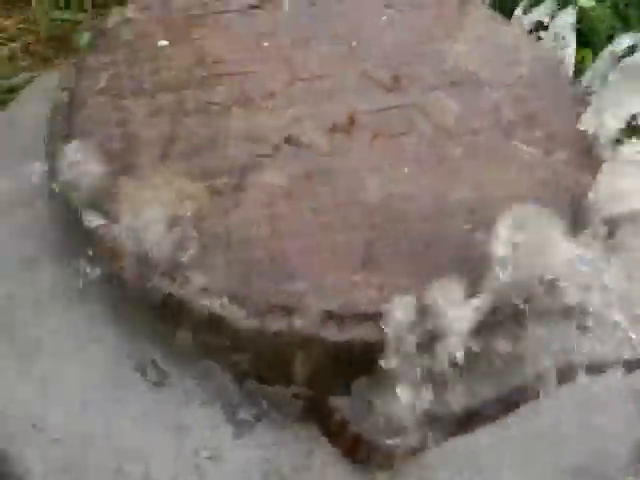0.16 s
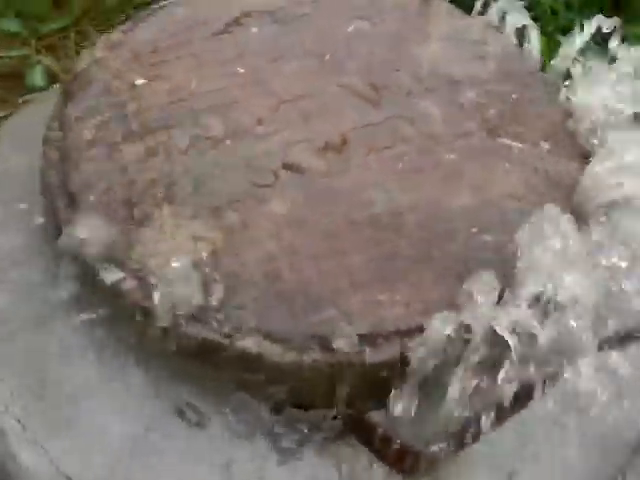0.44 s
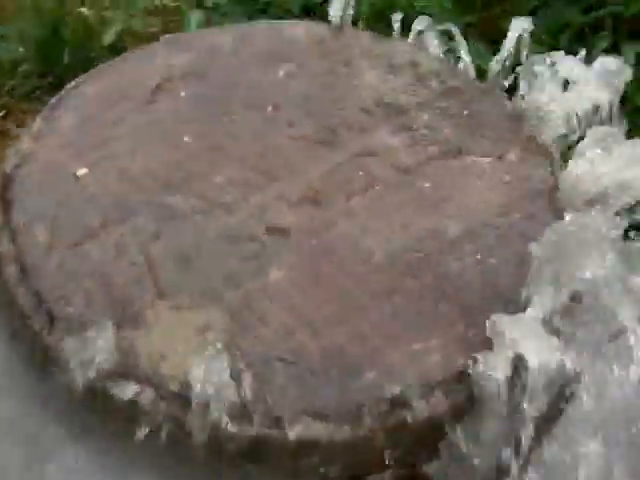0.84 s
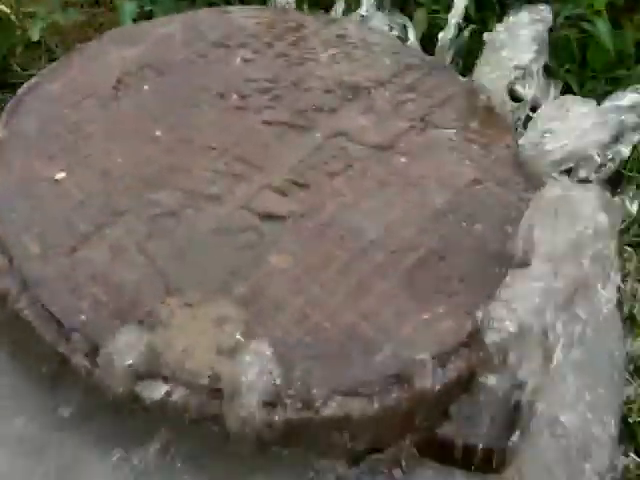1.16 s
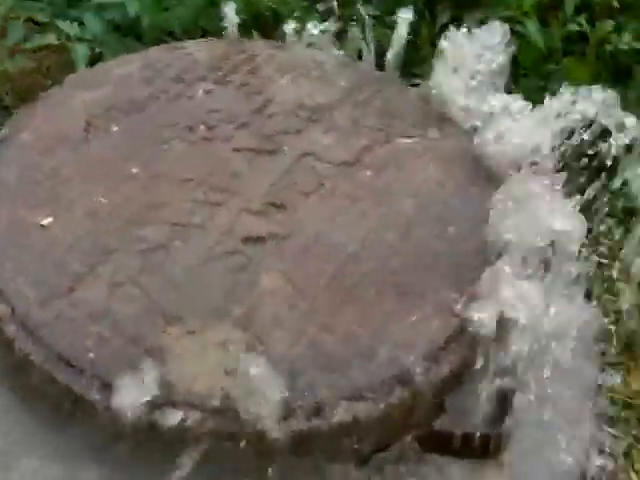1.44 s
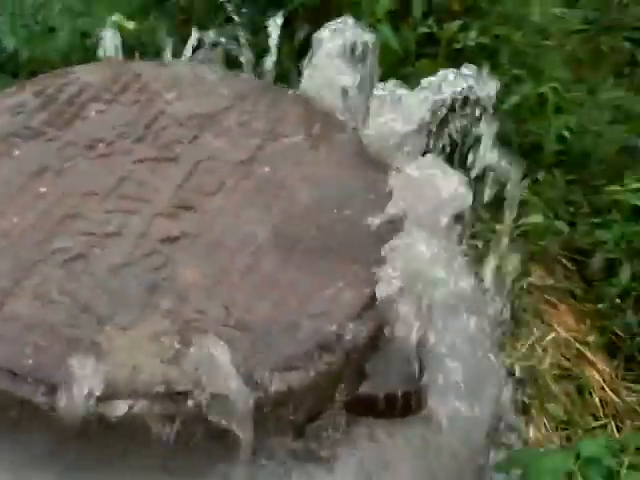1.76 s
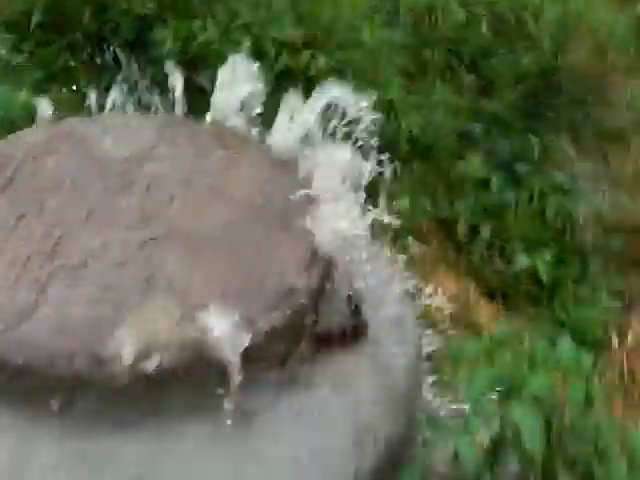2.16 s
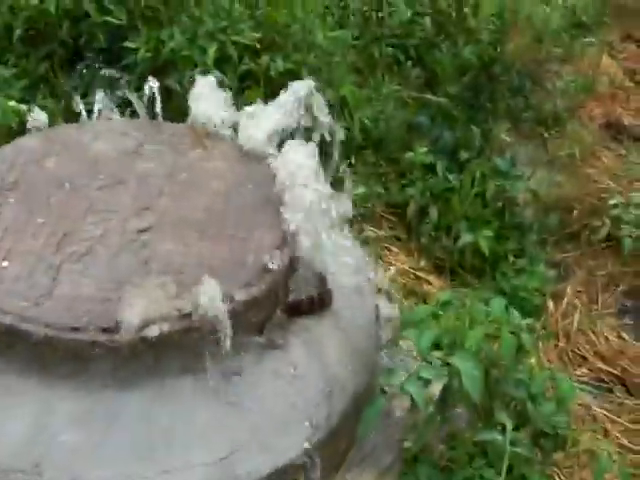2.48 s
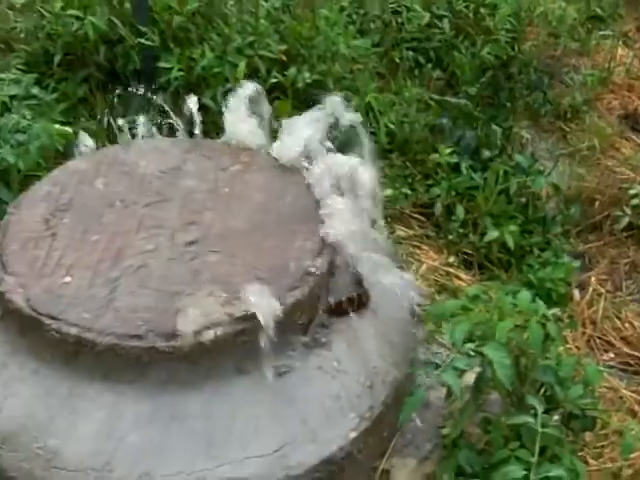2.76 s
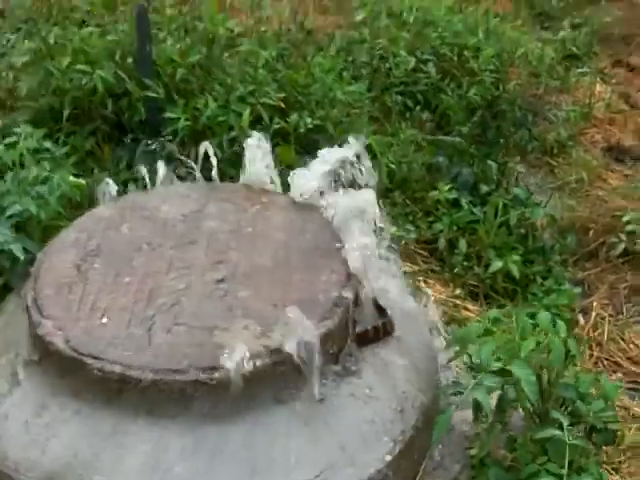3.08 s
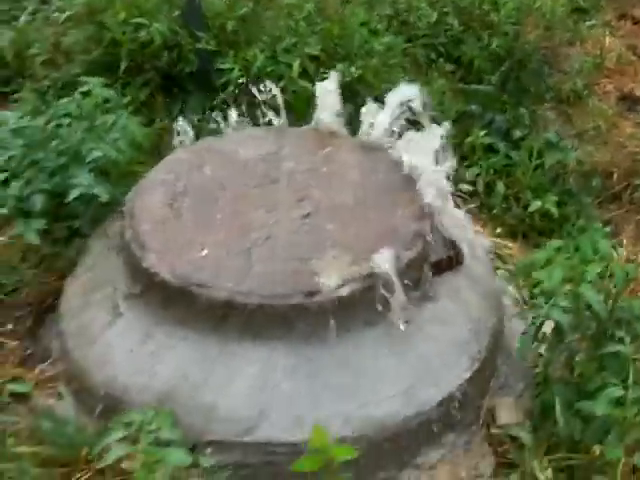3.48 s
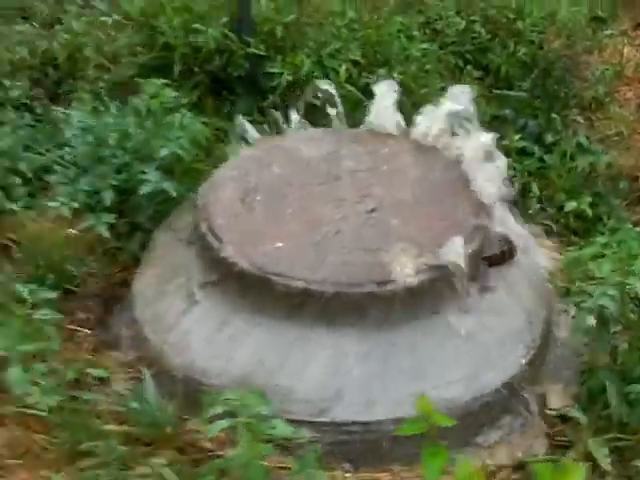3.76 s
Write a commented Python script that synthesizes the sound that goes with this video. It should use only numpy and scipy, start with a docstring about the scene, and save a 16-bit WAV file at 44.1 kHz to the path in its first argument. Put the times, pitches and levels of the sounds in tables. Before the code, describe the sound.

A continuous splashing rush of water spills from under a manhole lid outdoors, with fizzing bubbles and drops hitting concrete. The water softens as the microphone retreats, while wind thumps lightly on it over a faint low hum.

```python
"""A splashing wash of water, gushing out round the rim of a manhole cover onto concrete.
The spray carries countless ringing bubbles and drop ticks; larger plops and splats stand out.
The wash fades as the listener backs away. Underneath, the shaft hums low,
and gusts of wind buffet the microphone."""
import sys
import numpy as np
from scipy import signal
from scipy.fft import rfft, irfft
from scipy.io import wavfile
from scipy.ndimage import uniform_filter1d

SR = 44100
rng = np.random.default_rng(int(sys.argv[2]) if len(sys.argv) > 2 else 0)


def bounce(signal):
    """Save signal as a 16-bit WAV file at the path given by the first command-line argument."""
    frames = np.transpose(np.atleast_2d(signal))
    limited = np.clip(frames, -1, 1)
    pcm = np.round(limited * 32767).astype(np.int16)
    wavfile.write(sys.argv[1], SR, pcm)


N = 172872

# how strongly bubbles ring across the range: (pitch [Hz], level [dB])
BUBBLE_COLOUR = [(900, -8.5), (1500, -5), (2600, 1), (6000, 10.5), (11000, 9.5)]
# bright hiss of drops landing: (frequency [Hz], level [dB])
DROP_COLOUR = [(1200, -17), (3000, 6.5), (5000, 8.5), (11000, 4.5), (16000, -10)]
PLOP_GLIDE = 0.242  # upward chirp of the larger bubbles, as a share of their pitch


def gain_of(db):
    return 10 ** (np.asarray(db) / 20)


def unit_rms(x):
    return x / np.sqrt(np.mean(x ** 2) + 1e-20)


def gain_at(colour, hz):
    """Gain of a (frequency, dB) curve at hz, read along a log frequency axis."""
    corners_hz, db = np.transpose(colour)
    return gain_of(np.interp(np.log(hz + 1), np.log(corners_hz + 1), db))


def fader(points):
    """A (time, dB) curve drawn out to one level a sample."""
    return np.interp(np.arange(N) / SR, *np.transpose(points))


def add(mix, start_s, sound):
    part = mix[round(start_s * SR):][:len(sound)]
    part += sound[:len(part)]


def equalise(x, colour):
    """Shape x with a (frequency, dB) curve and bring it to rms 1."""
    return unit_rms(irfft(rfft(x) * gain_at(colour, np.fft.rfftfreq(N, 1 / SR)), N))


def noise(colour):
    return equalise(rng.standard_normal(N), colour)


def wander(span_s):
    """Smooth random motion of rms 1 that changes over about span_s."""
    width = max(round(span_s * SR), 2)
    return unit_rms(uniform_filter1d(uniform_filter1d(rng.standard_normal(N), width), width))


def scatter(per_s, spread_db):
    """Sparse clicks of random sign, a few of them large."""
    chance, size, sign = rng.random(N), rng.exponential(1, N), rng.choice([-1., 1.], N)
    return sign * gain_of(spread_db * np.minimum(size, 3.2)) * (chance < per_s / SR)


def bubble(hz, cycles, glide, rise=1.0):
    """Trapped air ringing: a sine that swells, chirps upward and dies within some cycles."""
    age = np.arange(round(4 * cycles * SR / hz)) * hz / SR / cycles  # in ring lengths, as is rise
    envelope = 2.31 * (1 - np.exp(-age / rise)) * np.exp(-2 * age)
    return envelope * np.sin(2 * np.pi * cycles * (age + glide * age ** 3 / 3))


def spray(patch_db=3):
    """The main wash: broad noise in which patches of the spectrum swell and sink."""
    frames, bands = N // 64 + 5, 129
    real, imaginary, patches = rng.standard_normal((frames, bands, 3)).T
    patches = uniform_filter1d(patches, 6, axis=0)  # across bands
    patches = unit_rms(uniform_filter1d(patches, 20, axis=1))  # along time
    spectra = (real + 1j * imaginary) * gain_of(patch_db * patches)
    wash = signal.istft(spectra, nperseg=256, noverlap=192)[1][:N]
    # tone of the spray: (frequency [Hz], level [dB])
    spray_colour = [(290, -29), (500, -10), (868, -6), (1060, -15.5), (1870, -0.5), (2690, 1.5), (3860, -1),
                    (6610, -2.5), (11800, -6), (15100, -17), (16000, -23)]
    return gain_of(-5) * equalise(wash, spray_colour)


def fizz(clumps, sizes=56):
    """Thousands of small bubbles a second, each ringing at the pitch of its size, in clumps."""
    births = scatter(per_s=3000 * clumps, spread_db=4)
    size, variation = rng.integers(0, sizes, N), rng.random((sizes, 2))
    out = np.zeros(N)
    for k, hz in enumerate(np.geomspace(897, 11180, sizes)):
        ring, chirp = variation[k]
        grain = bubble(hz, cycles=6.2 * (.5 + ring), glide=0.426 * chirp)
        out += gain_at(BUBBLE_COLOUR, hz) * signal.oaconvolve(births * (size == k), grain)[:N]
    return gain_of(-5) * unit_rms(out)


def ticks(clumps, puff_s=0.00085):
    """Small drops landing, each a short puff of treble."""
    puff = np.exp(-abs(np.arange(-200, 200)) / SR / puff_s)
    landings = abs(scatter(per_s=270 * clumps, spread_db=3.5))
    gate = signal.oaconvolve(landings, puff)[:N]
    return gain_of(-8.5) * unit_rms(gate * noise(DROP_COLOUR))


def plinks(clumps, sizes=30):
    """Sparse mid-sized bubbles with a clear rising chirp."""
    births = scatter(per_s=40 * clumps, spread_db=3.5)
    size = rng.integers(0, sizes, N)
    out = np.zeros(N)
    for k, hz in enumerate(np.geomspace(1150, 3400, sizes)):
        grain = bubble(hz, cycles=rng.uniform(4.9, 10.4), glide=PLOP_GLIDE * rng.uniform(0.37, 1.32))
        out += gain_at(BUBBLE_COLOUR, hz) * signal.oaconvolve(births * (size == k), grain)[:N]
    return gain_of(-14.5) * unit_rms(out)


def plops(trail_s=.015):
    """Each large bubble rings with a hard attack; two softer ones of nearby pitch trail it."""
    # large bubbles: (time [s], level [dB], pitch [Hz], ring length [cycles])
    large_bubbles = [(0.015, -34, 1400, 12), (0.061, -24.5, 1380, 10.5), (0.124, -27.5, 1940, 11),
                     (0.272, -37, 1240, 7.9), (0.224, -27, 1770, 5.9), (0.489, -26.5, 1600, 3),
                     (0.672, -29, 1540, 6.5), (0.842, -28.5, 1640, 20), (0.914, -29, 1810, 4.6),
                     (1.392, -28, 1570, 12), (1.425, -29, 1820, 23), (1.614, -31, 1010, 6.8),
                     (1.706, -31, 1220, 5.6), (1.756, -19.5, 1670, 4.6), (1.959, -30, 1590, 11),
                     (2.102, -28.5, 1540, 14), (2.212, -26, 1750, 7.9), (2.482, -27.5, 1190, 4.4),
                     (3.361, -35, 1750, 5.6), (3.478, -35.5, 1510, 10), (3.2636, -26, 2230, 4.1),
                     (3.325, -32, 2330, 5), (3.3897, -29, 2510, 12), (2.291, -21.5, 3500, 4.9),
                     (0.028, -19.5, 2500, 11.5), (0.0602, -26, 2250, 8.8), (0.1236, -24, 2180, 15),
                     (0.2224, -20, 2580, 4.9), (0.2403, -17, 2620, 4.7), (0.354, -19.5, 2800, 8.3),
                     (0.4165, -20.5, 3240, 12), (0.746, -22, 3200, 5.7), (0.7934, -16.5, 3500, 6),
                     (1.0308, -27, 3080, 7.7), (1.1268, -21.5, 2920, 13), (1.2432, -20.5, 2470, 7.3),
                     (1.3945, -19.5, 2140, 4.7), (1.4159, -12.5, 3000, 8.1), (1.4582, -20.5, 2820, 16),
                     (2.805, -27, 2670, 4.5), (1.518, -21.5, 3300, 11), (1.6896, -24, 2940, 14),
                     (0.699, -23, 2650, 8), (0.602, -26, 2230, 8), (1.8647, -17, 2300, 1.6),
                     (2.05, -24, 2560, 6.5), (2.101, -25, 2630, 4.9), (2.3974, -25, 2030, 4),
                     (2.5403, -26, 4050, 11), (3.3629, -25, 2350, 7.3), (3.4532, -26, 2410, 3.8),
                     (3.7748, -30.5, 2600, 10)]
    out, trails = np.zeros(N), rng.random((len(large_bubbles), 2, 2))
    for (s, db, hz, cycles), trail in zip(large_bubbles, trails):
        start_hz = hz / (1 + PLOP_GLIDE / 3)  # starts flat and glides up through its pitch
        add(out, s, gain_of(db) * bubble(start_hz, cycles, PLOP_GLIDE, rise=0.06))
        for late, detune in trail:
            follower = bubble(hz * (.8 + .7 * detune), cycles, PLOP_GLIDE)
            add(out, s + 0.00189 + trail_s * late, gain_of(db + 7 * (1 - late)) * follower)
    return out


def splats(scatter_s=0.0025):
    """Big drops hitting concrete: a bright ping inside a burst of scattered spray."""
    # drop impacts: (time [s], ping level [dB], pitch [Hz], spray level [dB])
    impacts = [(0.2055, -7, 6750, -34), (0.2255, -15, 6240, -24), (0.2394, -12, 6060, -21),
               (0.323, -19, 6830, -22.5), (0.346, -13.5, 6050, -37), (0.4153, -16, 4380, -26),
               (0.4732, -7, 10300, -22.5), (0.505, -21, 5300, -18), (0.529, -28, 5630, -19),
               (0.156, -14, 5200, -33), (0.6847, -25, 4980, -25), (1.037, -5, 7250, -17.5),
               (1.173, -12, 4800, -23), (1.2592, -12, 5500, -21.5), (1.2984, -23, 5860, -26),
               (1.397, -16, 3670, -35), (1.416, -30, 4860, -22), (1.5122, -23, 5300, -23),
               (1.030, -16, 6000, -29), (1.046, -17, 5000, -22), (1.5858, -18, 4330, -33),
               (1.8732, -2.5, 6000, -27), (2.1306, -19, 4820, -26), (2.3035, -18, 12000, -30),
               (2.307, -18, 10500, -33), (2.3155, -13.5, 7950, -25.5), (2.4, -17, 5560, -30.5),
               (2.479, -13.5, 8710, -23), (3.047, -16, 8970, -29), (3.453, -18, 4900, -36),
               (1.499, -16, 9820, -41), (1.5863, -12, 10000, -28), (1.875, -11.5, 10800, -24),
               (2.356, -24, 4200, -28.5)]
    pings, gate = np.zeros(N), np.zeros(N)
    burst = np.exp(-abs(np.arange(3000) / SR / scatter_s - 3))
    for s, db, hz, spray_db in impacts:
        add(pings, s, gain_of(db) * bubble(hz, cycles=5.5, glide=0.12, rise=0.25))
        add(gate, s - 3 * scatter_s, gain_of(spray_db) * burst)  # crests on the impact
    return pings + gate * noise(DROP_COLOUR)


def wind(flutter_hz=190, rolloff_hz=270):
    """Wind on the microphone: a light breeze, and gusts that are arches of thud and faster flutter."""
    # low rumble of air on the microphone: (frequency [Hz], level [dB])
    thud_colour = [(12, -31), (20, 13.5), (59, 3), (138, -2), (242, -15), (300, -26.5), (400, -36),
                   (520, -50), (880, -120)]
    # breeze under the gusts: (time [s], level [dB])
    breeze = [(0.0, -41), (0.59, -54), (3.92, -41.5)]
    # gusts: (start [s], length [s], level [dB], share of flutter [dB])
    gusts = [(0.004, 0.048, -48, -9), (0.059, 0.13, -31.5, -16.5), (0.196, 0.083, -36.5, -11.5),
             (0.718, 0.089, -42.5, -11), (0.749, 0.15, -39, -40), (1.083, 0.047, -39, -17),
             (1.149, 0.064, -38.5, -28), (1.196, 0.04, -37.5, -29), (1.394, 0.024, -36.5, -11),
             (2.453, 0.055, -33.5, 1), (2.526, 0.068, -24, -9), (2.59, 0.06, -31, 0.5),
             (2.642, 0.079, -33.5, -6.5), (2.888, 0.067, -31.5, -11), (3.042, 0.1, -37.5, 0),
             (3.212, 0.027, -37, -10.5), (3.254, 0.082, -41, -9), (3.376, 0.042, -40, 1.5),
             (3.419, 0.053, -33.5, -11), (3.735, 0.025, -31, -36), (3.779, 0.04, -37, -19)]
    hz = np.fft.rfftfreq(N, 1 / SR)
    band = hz / flutter_hz / (1 + (hz / flutter_hz) ** 2) / (1 + (hz / rolloff_hz) ** 4)
    flutter = irfft(rfft(rng.standard_normal(N)) * band, N) * gain_of(1.5 * wander(0.007))
    rumble = noise(thud_colour)
    out = gain_of(fader(breeze)) * noise(thud_colour)
    for s, length, db, flutter_db in gusts:
        thud_hz = 97.3 + 1.2 * flutter_db  # more flutter, higher thud
        thud = signal.lfilter(*signal.iirpeak(thud_hz, Q=1.16, fs=SR), rumble)
        span = slice(round(s * SR), round((s + length) * SR))
        arch = np.sin(np.pi * np.linspace(0, 1, len(thud[span])) ** 0.8)  # crests a little early
        body, edge = unit_rms(arch * thud[span]), unit_rms(arch * flutter[span])
        add(out, s, gain_of(db) * (body + gain_of(flutter_db + 0.5) * edge))
    return out


def air_pops():
    """Sharp pops of air on the microphone: a push and a slower rebound."""
    # pops: (time [s], level [dB], width [s])
    pops = [(2.472, -21, .0015), (2.484, -10.5, 0.00057), (2.612, -18.5, 0.00042)]
    out = np.zeros(N)
    for s, db, width in pops:
        age = np.linspace(-3, 9, round(12 * width * SR))  # in widths
        push = np.exp(-age ** 2 / 2)
        rebound = .4 * np.exp(-((age - 3.5) / 2.5) ** 2 / 2)
        add(out, s - 3 * width, gain_of(db) * (push - rebound))
    return out


def shaft():
    """The shaft under the cover hums: a steady bed of low noise."""
    # hum of the shaft and far rush: (frequency [Hz], level [dB])
    shaft_colour = [(15, -33), (25, -22), (75, 8), (93, -5.5), (128, -3), (166, -10.5), (189, -11.5),
                    (430, -11.5), (618, -14), (1200, -16), (1560, -22), (2640, -120)]
    return gain_of(-45.5) * noise(shaft_colour)


def scene(clump_db=2.1):
    """The receding water with its plops and splats, over the wind and the shaft."""
    # the water as the listener backs away: (time [s], level [dB])
    retreat = [(0.0, -26), (1.24, -27.5), (3.92, -34)]
    water_db = fader(retreat)
    bubbling, spitting = gain_of(clump_db * wander(0.036)), gain_of(clump_db * wander(0.029))
    near = gain_of(0.22 * (water_db - water_db[0]))  # fizz and ticks fade faster than the wash
    surge_db = 2.5 * np.exp(-((np.arange(N) / SR - 2.74) / .045) ** 2)  # one brief surge of splashing
    flicker_db = .6 * wander(0.014)
    water = spray() + plinks(bubbling) + near * (fizz(bubbling) + ticks(spitting))
    water *= gain_of(water_db + surge_db + flicker_db)
    return (water + plops() + splats() + shaft() + wind() + air_pops())[None]


def record(dry, notch_hz=7633, notch_width_hz=130, cutoff_hz=15950):
    """A narrow notch in the treble, then a steep high cut."""
    notched = signal.lfilter(*signal.iirnotch(notch_hz, notch_hz / notch_width_hz, SR), dry)
    high_cut = signal.firwin(1023, cutoff_hz, window=("kaiser", 9), fs=SR)
    return signal.oaconvolve(notched, high_cut[None], "same")


dry = scene()
out = record(dry)
bounce(out)
```